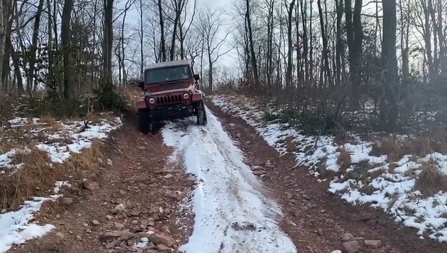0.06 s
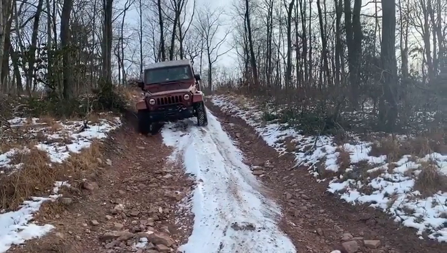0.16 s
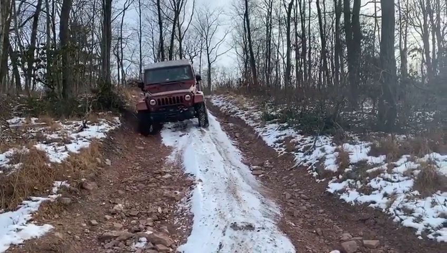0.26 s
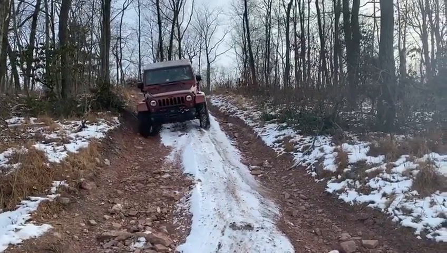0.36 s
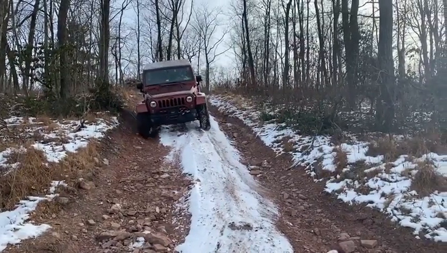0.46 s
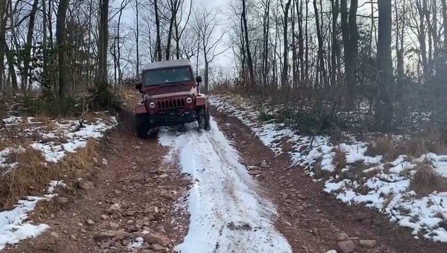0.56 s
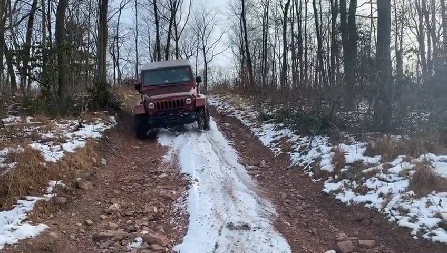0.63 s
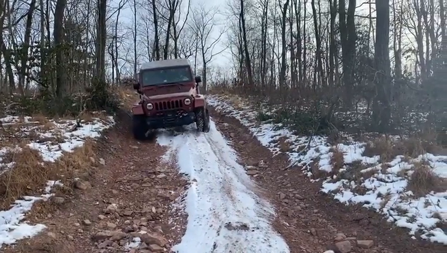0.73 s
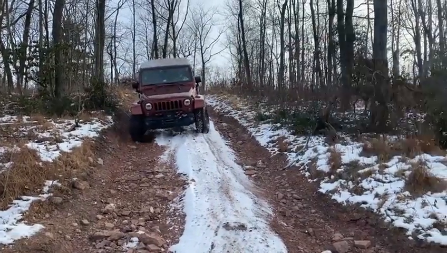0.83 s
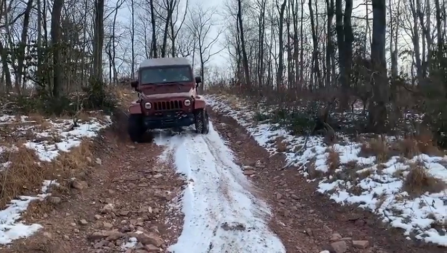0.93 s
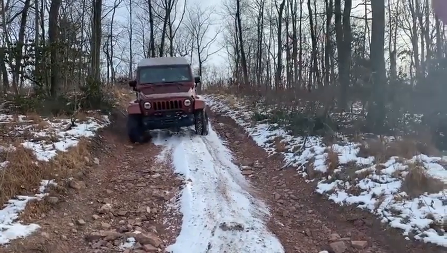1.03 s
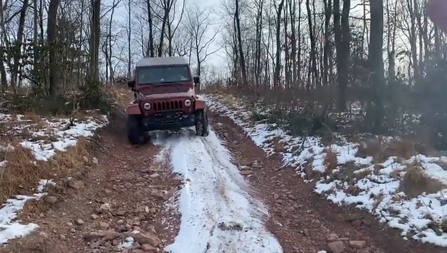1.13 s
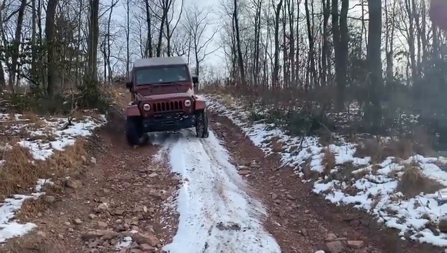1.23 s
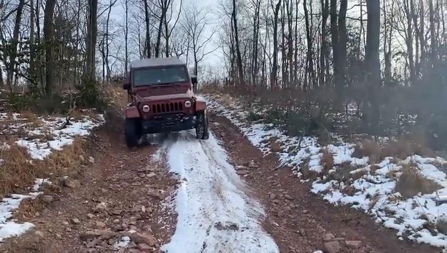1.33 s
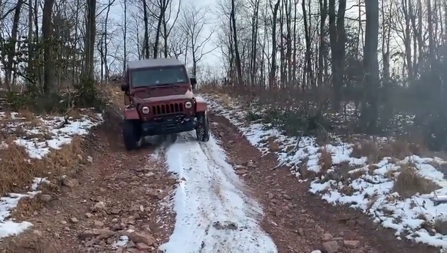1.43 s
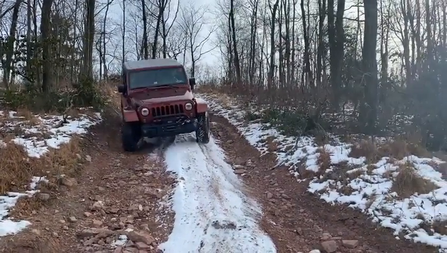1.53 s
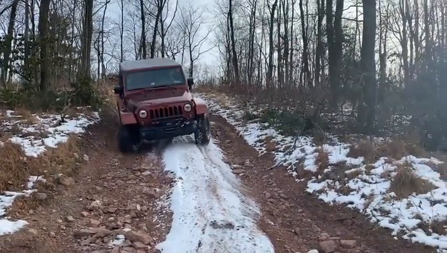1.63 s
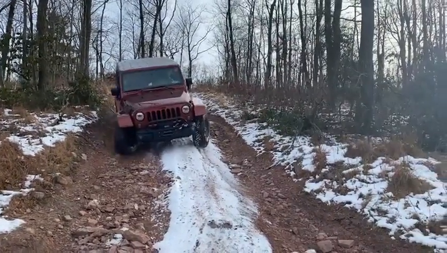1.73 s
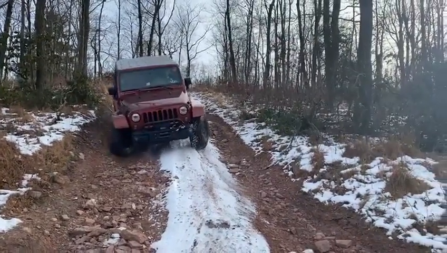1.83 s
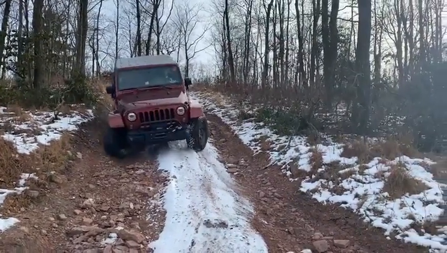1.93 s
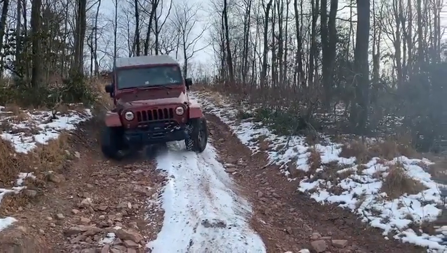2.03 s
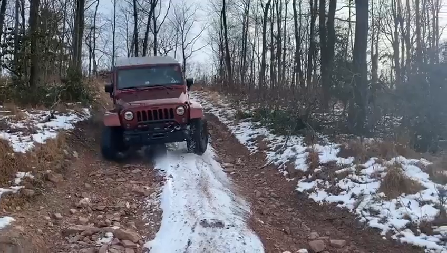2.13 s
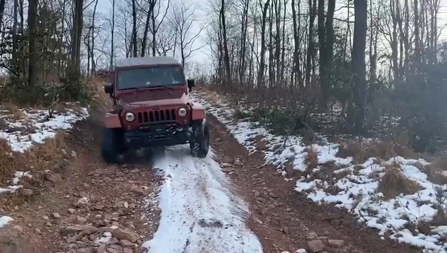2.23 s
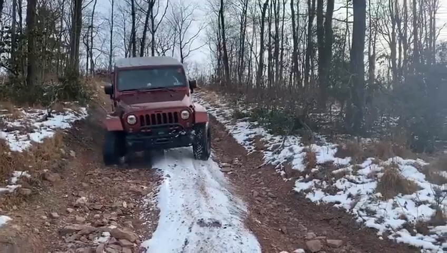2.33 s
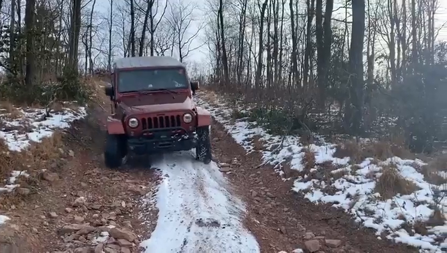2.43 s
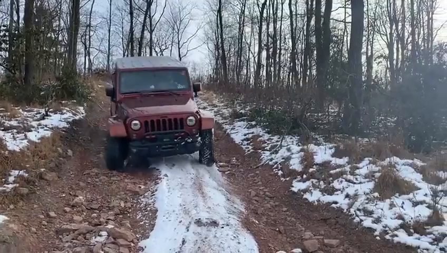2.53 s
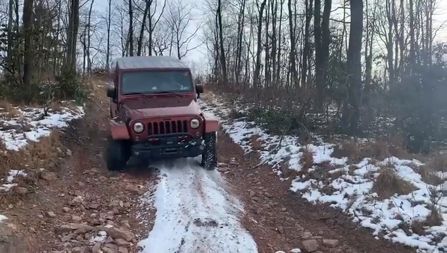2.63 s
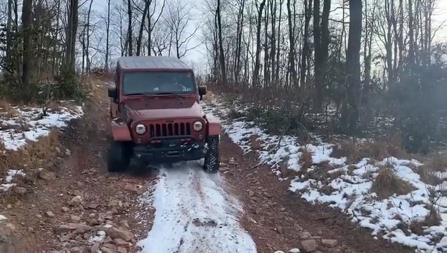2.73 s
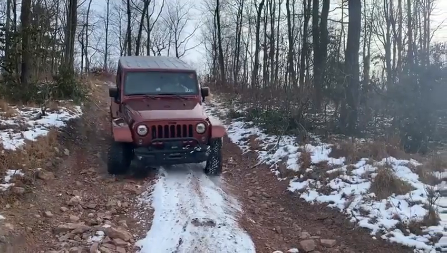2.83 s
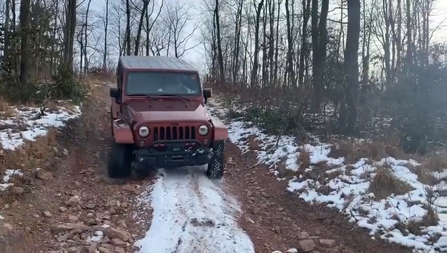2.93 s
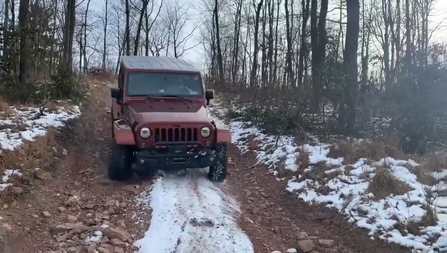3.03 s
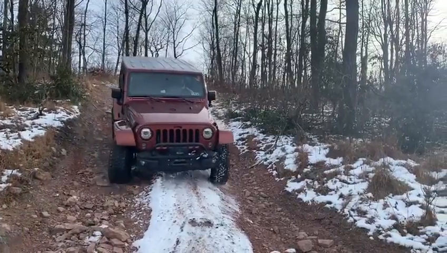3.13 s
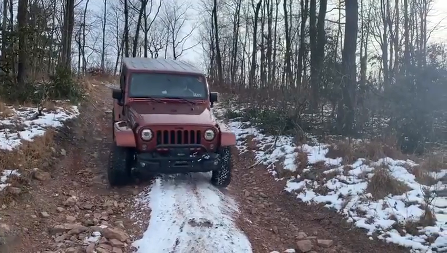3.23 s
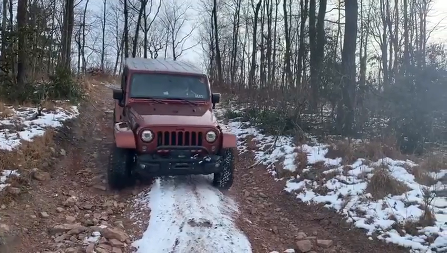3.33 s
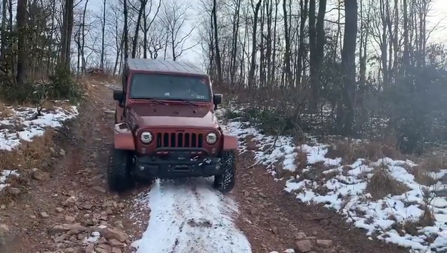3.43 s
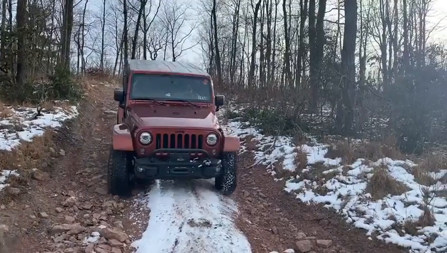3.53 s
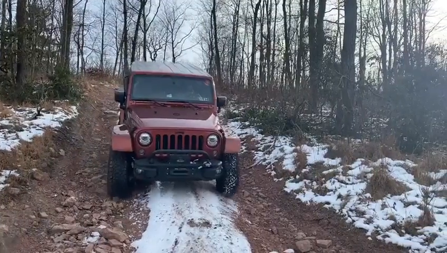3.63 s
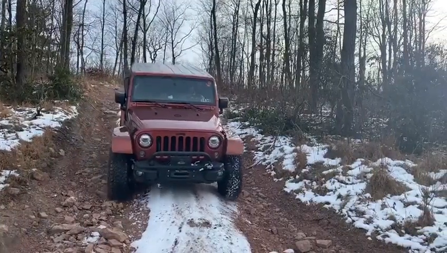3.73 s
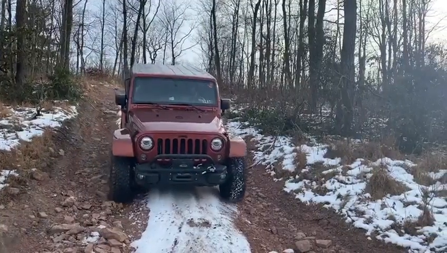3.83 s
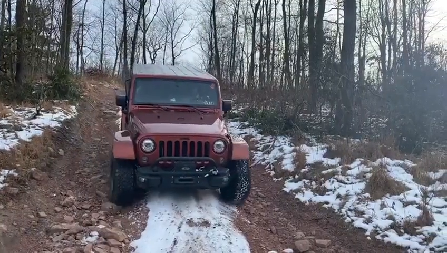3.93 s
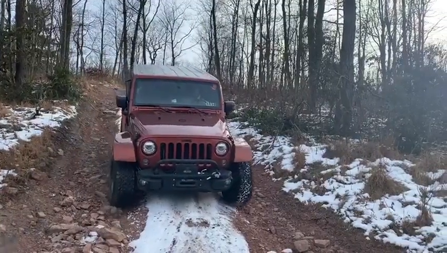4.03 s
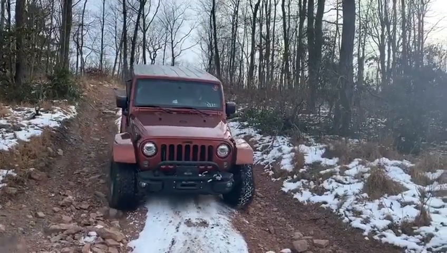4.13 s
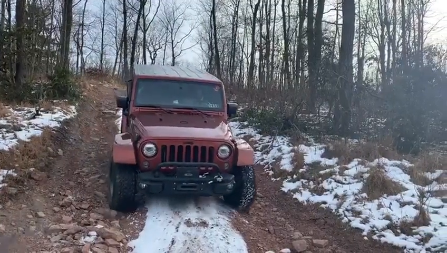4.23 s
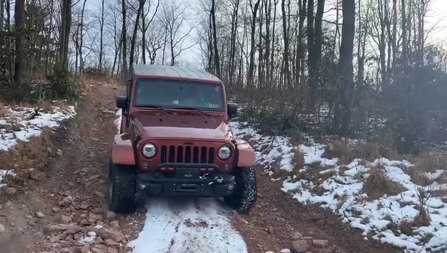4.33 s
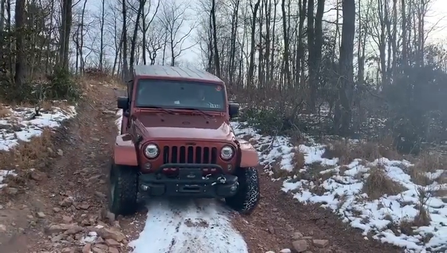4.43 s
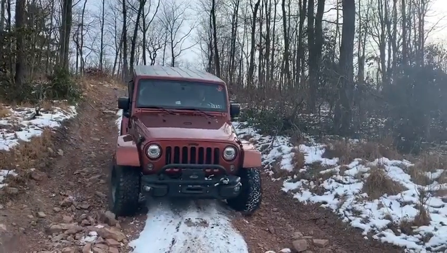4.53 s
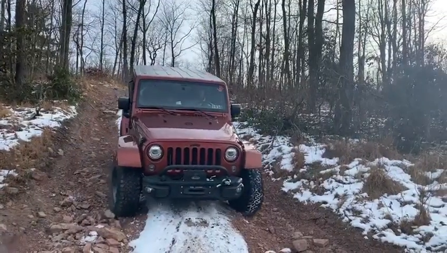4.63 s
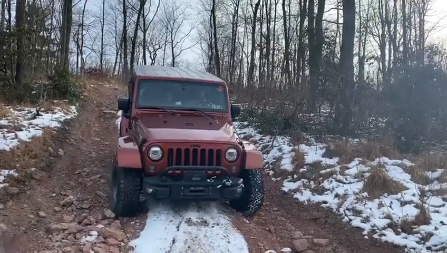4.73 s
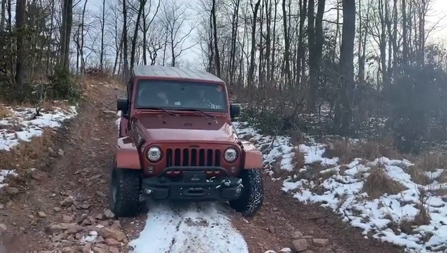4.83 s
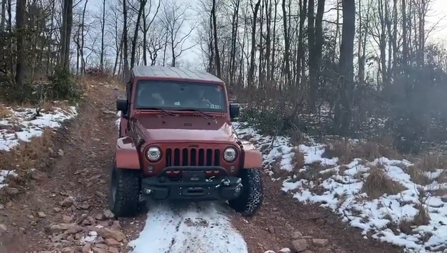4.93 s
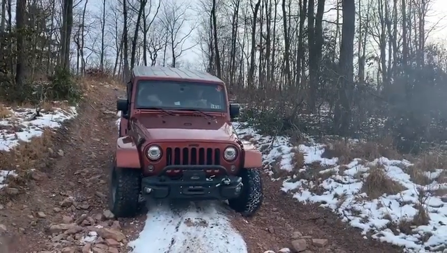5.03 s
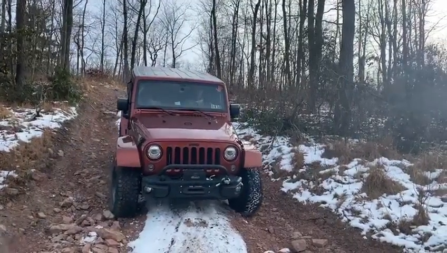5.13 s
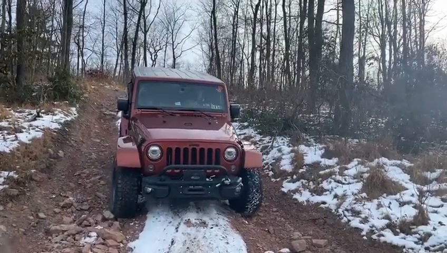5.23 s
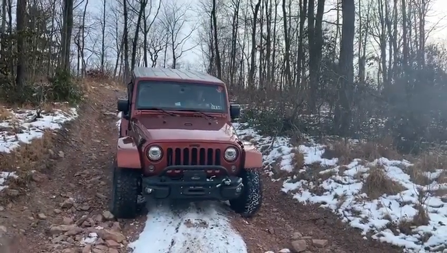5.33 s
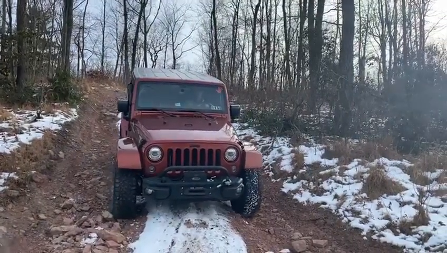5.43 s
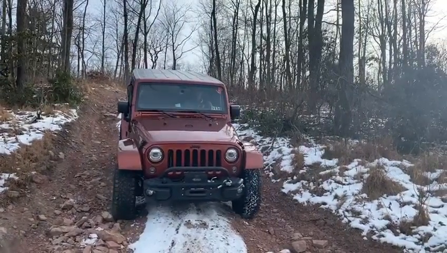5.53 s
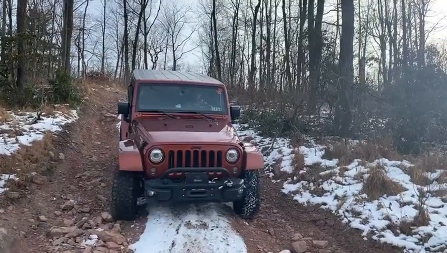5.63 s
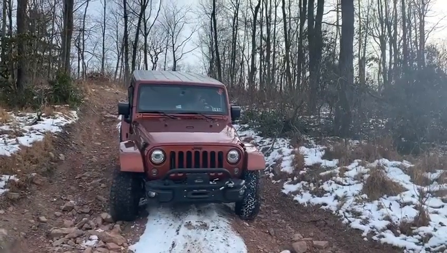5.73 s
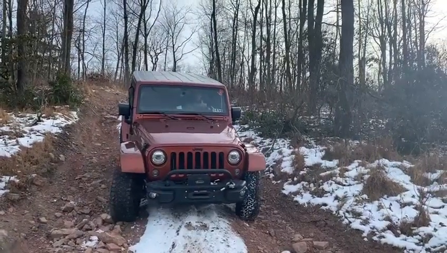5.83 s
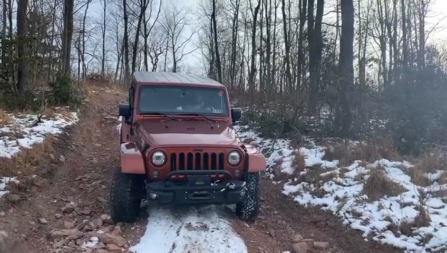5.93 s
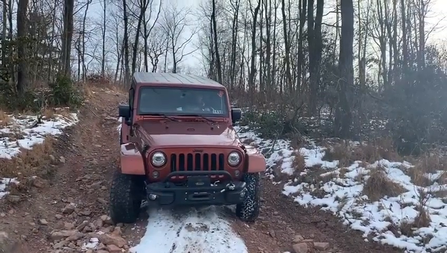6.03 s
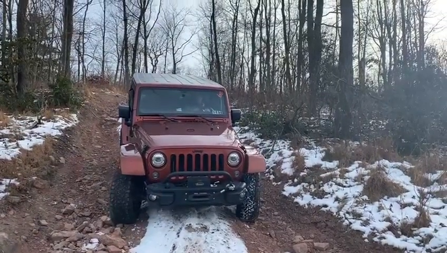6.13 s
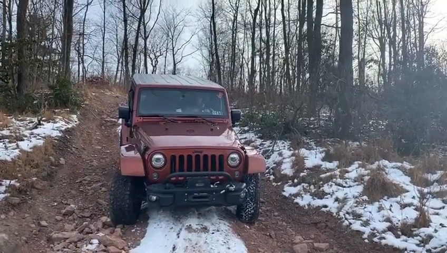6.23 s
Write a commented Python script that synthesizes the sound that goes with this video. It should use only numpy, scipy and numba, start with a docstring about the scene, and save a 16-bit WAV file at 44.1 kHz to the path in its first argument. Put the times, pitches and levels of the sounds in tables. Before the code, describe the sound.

Outdoors on a frozen forest trail, a heavy vehicle creeps closer over loose rock. Stones grind and thud dully, crust crunches, thin ice snaps brightly, and a low engine idles underneath. The tyres judder briefly before the wheels stop near five seconds. Then mostly idle remains, with faint cracks, a short brake groan and a slightly fuller engine. A handheld phone microphone, open air, no echo.

```python
"""Stones grind and knock under tyres, crust crunches and ice splinters over an idling engine; a brake groans once.
A four-wheel-drive creeps down a frozen, stony forest trail towards a phone and brakes almost to a stop.
Debris is heaps of short damped rings; knocks, pebbles and judders are struck modes; cracks and shards add
rushes of coloured noise. The engine is a wavering sine over coloured noise, the brake a tone of two harmonics."""
import sys
import numpy as np
from scipy import signal
from scipy.fft import rfft, irfft, next_fast_len
from scipy.io import wavfile
from scipy.ndimage import uniform_filter1d
from numba import njit

SR = 44100
rng = np.random.default_rng(int(sys.argv[2]) if len(sys.argv) > 2 else 0)


def unload_wav(signal):
    """Save mono or channel-first audio to the path in sys.argv[1] as 16-bit WAV at rate SR, clipped to [-1, 1]."""
    wavfile.write(
        sys.argv[1],
        SR,
        np.round(np.clip(np.atleast_2d(signal).T, -1, 1) * 32767).astype(np.int16),
    )


N = 276859
T = np.arange(N) / SR

# spectra of crust crumbs, grit and splintering ice: f/Hz, relative level/dB per Hz
CRUNCH_SPECTRUM = [(330, -5), (480, -1.5), (710, -7), (960, -5.5), (1130, -15), (1300, -36)]
GRIT_SPECTRUM = [(1000, -22.5), (1200, -3.5), (1500, 0.5), (1800, -0.5), (2150, -16.5), (2800, -35)]
ICE_SPECTRUM = [(1700, -3.5), (2200, -5.5), (3700, -5.5), (4240, -11.5), (5100, -3), (6700, -6.5),
                (7500, -6.5), (8700, -16), (9400, -57.5)]

USUAL_STONES_DB, USUAL_GRIT_DB = -30, -46  # the load at which the other sizes have their own base level
STOP_S = 4.93  # the wheels stop rolling


def undb(db):
    """Decibels to gain."""
    return 10 ** (np.asarray(db) / 20)


def unit(x):
    """Scale to rms 1."""
    return x / np.sqrt(np.mean(x ** 2))


def ramp(start, length):
    """Straight rise from 0 at start to 1 after length seconds."""
    return np.clip((T - start) / length, 0, 1)


def walk(rate):
    """Random levels held 1 / rate s and slewed twice; spread near 1."""
    hold = int(SR / rate)
    steps = np.repeat(rng.standard_normal(N // hold + 1), hold)
    return 1.35 * uniform_filter1d(uniform_filter1d(steps, hold), hold)[:N]


def follow(table):
    """Columns of a curve table, sample by sample."""
    s, *columns = np.transpose(table)
    return (np.interp(T, s, column) for column in columns)


def colour(x, points):
    """Shape a flat signal to a spectrum that falls steeply outside its points; rms 1."""
    hz, db = np.transpose(points)
    size = next_fast_len(N)
    log_f = np.log(np.arange(size // 2 + 1) * SR / size + 1)
    outside = np.maximum(np.maximum(np.log(hz[0]) - log_f, log_f - np.log(hz[-1])), 0)
    gain = undb(np.interp(log_f, np.log(hz), db) - 60 * outside)
    return unit(irfft(rfft(x, size) * gain, size)[:N])


def noise(points):
    """Steady noise of a given spectrum, rms 1."""
    return colour(rng.standard_normal(N), points)


@njit
def ring(start, hz, t60, size, length):
    """Add one damped sine for each grain, from its start sample until it is 60 dB down."""
    out = np.zeros(length)
    for k in range(len(start)):
        turn = np.exp(2j * np.pi * hz[k] / SR - np.log(1000) / (t60[k] * SR))
        z = size[k] + 0j
        for i in range(start[k], min(length, start[k] + int(t60[k] * SR))):
            out[i] += z.imag
            z *= turn
    return out


def grains(points, count, cycles, spread_db):
    """Scattered rings, each 60 dB down after some cycles; a spread makes many small and a few large."""
    when, pitch, luck, side = rng.random((count, 4)).T
    lowest, highest = points[0][0], points[-1][0]
    hz = lowest * (highest / lowest) ** pitch
    # higher grains are shorter and sparser per Hz, so they are made larger to keep the heap flat
    size = hz * undb(-spread_db * np.log(1.004 - luck)) * np.sign(side - .5)
    heap = ring((when * N).astype(np.int64), hz, cycles / hz, size, N)
    return colour(heap, points)


def bursts(s, db, t60, rise):
    """Envelope of short rushes: quick rise, exponential fall."""
    out = np.zeros(N)
    for t0, gain, fall in zip(s, undb(db), t60):
        fall = max(fall, .005)
        i = int(t0 * SR)
        t = T[:min(N - i, int(fall * SR))]
        out[i:i + len(t)] += gain * (1 - np.exp(-t / rise)) * np.exp(-np.log(1000) * t / fall)
    return out


def struck(s, db, hz, t60, ratios, soft):
    """Each blow rings a small cluster of modes (ratio, dB); taking away a faster ring softens the contact."""
    start = (s * SR).astype(np.int64)
    out = 0
    for k, (ratio, mode_db) in enumerate(ratios):
        f = np.minimum(hz * ratio, .45 * SR)
        fall = np.maximum(t60 / ratio, .003)
        size = (-1) ** k * undb(db + mode_db)  # neighbouring modes start in opposite directions
        out = out + ring(start, f, fall, size, N) - ring(start, f, soft * fall, size, N)
    return out


def crunch_level(stones_db, grit_db):
    """Level of the middle size in dB, which follows both the stones and the grit."""
    stones_gain = 0.38 * (stones_db - USUAL_STONES_DB)
    grit_gain = 0.36 * (grit_db - USUAL_GRIT_DB)
    return -39.5 + stones_gain + grit_gain


def clumps(count):
    """Gain of the finer debris: it gives way in sudden lumps, most of similar size, a few much smaller."""
    when, luck = rng.random((count, 2)).T
    db = -15.5 + 1.9 * np.log(1.01 - luck)
    return 0.5 + bursts(when * STOP_S, db, np.full(count, 0.082), rise=0.0064)


def slips():
    """Gains of stones, crunch, grit and ice while the tyre slips and scrapes: brief, with soft edges."""
    # scrapes: t/s, length/s, stones level/dB, grit level/dB, ice level/dB
    scrapes = [(0.788, 0.058, -25.5, -44.5, -71), (1.745, 0.031, -22, -38, -50),
               (1.885, 0.04, -31, -32, -35), (1.993, 0.022, -37, -34.5, -46.5),
               (2.108, 0.047, -20.5, -41, -51), (2.164, 0.08, -24.5, -36.5, -48.5),
               (2.266, 0.024, -22, -42, -45), (2.306, 0.07, -23, -39.5, -50),
               (3.021, 0.026, -25, -45, -47.5), (3.271, 0.041, -53, -38, -43.5),
               (3.721, 0.049, -31, -38.5, -48), (3.788, 0.033, -28, -40, -43),
               (2.657, .15, -28.5, -69, -55)]
    out = np.zeros((4, N))
    for s, length, stones_db, grit_db, ice_db in scrapes:
        db = [stones_db, crunch_level(stones_db, grit_db), grit_db, ice_db]
        out[:, int(s * SR):int((s + length) * SR)] = undb(db)[:, None]
    return uniform_filter1d(out, int(0.015 * SR), axis=1)


def tyres():
    """Debris gives way under the tread as heaps of rings; all but the boom share their patches."""
    # what the tread grinds, before its unevenness: t/s, stones level/dB, grit level/dB
    load = [(0.0, -33, -59.5), (0.5, -33, -56.5), (0.59, -30.5, -46), (0.78, -29, -49), (0.98, -31, -51.5),
            (1.1, -38.5, -50.5), (1.17, -29, -48), (1.49, -24.5, -43), (1.83, -28, -39.5),
            (2.24, -28.5, -45), (2.35, -33, -39), (2.51, -29.5, -44), (2.73, -32.5, -46), (3.18, -28, -42),
            (3.4, -29, -43.5), (3.42, -32.5, -45.5), (3.68, -29, -44), (3.92, -34.5, -46.5),
            (4.3, -30.5, -45), (4.6, -36, -52), (4.82, -42, -56), (4.9, -59, -53)]
    # spectra of tyre and body cavities, stones and frost: f/Hz, relative level/dB per Hz
    boom_spectrum = [(25, -28.5), (50, -3.5), (70, -1), (110, -1.5), (160, -22.5)]
    stones_spectrum = [(80, -32), (130, -1), (290, -4.5), (350, -4), (460, -14.5), (750, -26.5)]
    frost_spectrum = [(6800, -17.5), (7300, -0.5), (8200, -1.5), (8800, -9)]
    stones_db, grit_db = follow(load)
    boom_db = -31 + 0.5 * (stones_db - USUAL_STONES_DB)
    ice_db = -51.5 + 0.86 * (grit_db - USUAL_GRIT_DB)
    frost_db = -6 - 5.5 * T  # against the ice; it thins out as the vehicle nears

    boom = grains(boom_spectrum, count=1500, cycles=8.2, spread_db=1.0) * undb(boom_db)
    stones = grains(stones_spectrum, count=3000, cycles=5.85, spread_db=2.0)
    crunch = grains(CRUNCH_SPECTRUM, count=7000, cycles=16.0, spread_db=2.0)
    grit = grains(GRIT_SPECTRUM, count=7000, cycles=22.6, spread_db=2.0)
    ice = grains(ICE_SPECTRUM, count=30000, cycles=44.0, spread_db=0.5)
    ice = ice + grains(frost_spectrum, count=4000, cycles=77.0, spread_db=0.0) * undb(frost_db)
    debris = np.array([stones, crunch, grit, ice])

    stop_fade_s, fine_fade_s = 0.045, 0.22  # the finer debris dies away sooner
    rolling = 1 - ramp(STOP_S - stop_fade_s, stop_fade_s)
    fine_rolling = 1 - ramp(STOP_S - fine_fade_s, fine_fade_s)
    patch, tread = walk(8.8), walk(40)
    levels_db = np.array([stones_db, crunch_level(stones_db, grit_db), grit_db, ice_db])
    tread_db = np.array([[.3], [1.5], [1.5], [1.5]]) * tread
    steady = rolling * undb(levels_db + 0.66 * patch + tread_db)
    # crunch, grit and ice follow the lumps to different degrees
    steady[1:] *= unit(clumps(count=200)) ** np.array([[.7], [1.1], [.6]]) * fine_rolling
    ground = np.sum(np.hypot(steady, slips()) * debris, axis=0)

    creep = ramp(5.4, 0.11) * undb(-47.5 + 1.7 * walk(7.2))  # the stones move again, faintly
    return rolling * boom + creep * stones + ground


def engine():
    """The exhaust hums at an unsteady firing rate over the engine bay's rumble and hiss, which swell late on."""
    # spectrum of fan and engine bay: f/Hz, relative level/dB per Hz
    bay_spectrum = [(25, -20.5), (55, -1.5), (75, -1), (135, -12), (450, -21), (960, -22), (1110, -31.5),
                    (1450, -22.5), (2300, -30), (3500, -39), (7450, -42), (9800, -69)]
    firing_hz = 64.3 * (1 + 0.039 * walk(12))
    phase = 2 * np.pi * np.cumsum(firing_hz) / SR
    hum = np.sqrt(2) * np.sin(phase) * undb(-42.5 + 2.1 * walk(24))
    swell_db = 3.5 * ramp(5.46, 0.26)
    bay = noise(bay_spectrum) * undb(-44.5 + swell_db + .7 * walk(9))
    return hum + bay


def cracks():
    """A slab of crust breaks: a snap, a short ring, a rush of crumbs, grit and splinters."""
    # breaks: t/s, level/dB, f/Hz, brightness (splinters against that level)/dB
    breaks = [(0.119, -39.5, 1560, -9.5), (0.461, -31.5, 544, -24), (0.754, -27, 920, -29),
              (0.943, -28, 1620, -22.5), (1.681, -20, 768, -24), (1.821, -21.5, 907, -28),
              (2.09, -24, 917, -23.5), (2.456, -25.5, 1784, -12), (2.513, -26, 1775, -15.5),
              (3.073, -21, 1645, -21), (3.376, -18, 812, -25.5), (3.449, -23, 843, -15),
              (3.509, -26, 690, -21.5), (3.657, -23, 690, -20), (3.724, -24.5, 1550, -21),
              (3.921, -33, 610, -34), (4.157, -23, 600, -25), (4.247, -18.5, 556, -30.5),
              (4.288, -33, 1990, -14), (4.409, -33, 670, -26), (4.426, -23.5, 1000, -21.5),
              (4.576, -25, 955, -12.5), (4.669, -28, 1704, -20), (4.697, -33, 990, -23),
              (5.247, -31.5, 1013, -17.5), (5.297, -29, 970, -14), (5.691, -30.5, 990, -21),
              (6.142, -32, 1010, -19.5), (6.188, -34.5, 730, -23)]
    # spectrum of the snap: f/Hz, relative level/dB per Hz
    snap_spectrum = [(1700, -8), (2100, -3.5), (3400, -4), (4600, -12.5)]
    s, db, hz, bright_db = np.transpose(breaks)
    fall = np.full(len(s), 0.096)  # T60 in s
    grit_db = db + 2 + 0.87 * bright_db  # brighter breaks throw more grit
    snap = noise(snap_spectrum) * bursts(s, grit_db - 3, fall, rise=0.0005)
    crumbs = noise(CRUNCH_SPECTRUM) * bursts(s, db - 10, fall, rise=0.0012)
    grit = noise(GRIT_SPECTRUM) * bursts(s, grit_db, fall, rise=0.0012)
    splinters = noise(ICE_SPECTRUM) * bursts(s, db + bright_db, fall, rise=0.0012)
    slab = struck(s, db, hz, 0.49 * fall, [(.68, -10.5), (1, -1.5), (1.25, -10)], soft=0.12)
    return snap + crumbs + grit + splinters + slab


def knocks():
    """Loose stones tip over with a dull thud; deeper ones ring longer."""
    # thuds: t/s, level/dB, f/Hz
    thuds = [(0.121, -8.5, 288), (0.46, -14.5, 107), (0.732, -16.5, 73), (0.774, -15.5, 178),
             (0.9, -13.5, 231), (1.351, -16.5, 220), (1.553, -14, 148), (1.743, -2.5, 215.6),
             (1.996, -14, 216), (2.113, -12.5, 132), (2.136, -9, 202), (2.168, -9.5, 175), (2.268, -9, 299),
             (2.317, -14.5, 324), (3.127, -9, 160), (3.335, -13.5, 126), (3.398, -15.5, 169),
             (3.628, -12, 74), (3.661, -16, 110), (4.061, -16.5, 236), (4.134, -15, 156),
             (4.377, -18.5, 195), (4.53, -16.5, 93.5), (4.604, -15, 96.6), (4.625, -13.5, 98.4),
             (4.647, -9.5, 75.6), (4.7, -13.5, 230), (4.729, -13.5, 84.6), (4.849, -25, 71),
             (5.502, -29.5, 310), (5.945, -30.5, 283), (6.158, -29.5, 180), (6.193, -28, 86)]
    s, db, hz = np.transpose(thuds)
    t60 = 0.074 * (hz / 200) ** -0.78
    return struck(s, db, hz, t60, [(.6, -7.5), (1, 0), (1.6, -6)], soft=0.29)


def shards():
    """Thin ice snaps: a bright rush and a tiny ping."""
    # snaps: t/s, ping level/dB, f/Hz, rush against ping/dB
    snaps = [(0.4039, -37, 8040, -0.5), (0.4796, -39.5, 8050, -11), (0.698, -32, 7500, -7),
             (0.7243, -34, 5820, -1.5), (0.959, -39, 7600, -11), (1.5265, -32.5, 5540, -5),
             (2.0637, -34, 5820, -6), (2.139, -43, 3560, 8.5), (2.446, -39, 7100, 3),
             (2.584, -37, 5540, 0.5), (2.907, -30, 5120, -14), (2.943, -29.5, 5860, -12),
             (2.964, -37, 6000, -7), (3.69, -30, 5540, -2.5), (5.195, -52, 5140, -1)]
    s, db, hz, rush_db = np.transpose(snaps)
    fall = np.full(len(s), 0.035)  # T60 in s
    rush = noise(ICE_SPECTRUM) * bursts(s, db + rush_db, fall, rise=0.00094)
    ping = struck(s, db, hz, 0.53 * fall, [(1, 0.0044)], soft=0.17)
    return rush + ping


def pebbles():
    """Small stones click together: three brief modes, damped within a set number of cycles."""
    # clicks: t/s, level/dB, f/Hz
    clicks = [(.574, -28.5, 1910), (1.044, -28.5, 1790), (2.435, -29, 2720), (2.493, -28, 2720),
              (2.6006, -21, 2000), (2.9643, -30, 2000), (3.702, -16.5, 680), (3.8176, -33, 3030),
              (3.9734, -32, 2210), (3.9897, -26, 2350), (4.16, -27, 1970), (5.766, -23.5, 710)]
    s, db, hz = np.transpose(clicks)
    t60 = 21.6 / hz
    return struck(s, db, hz, t60, [(.7, -9.5), (1, -4), (1.4, -10.5)], soft=0.15)


def judders():
    """The locked tyre judders over stone: rubber grips and lets go in uneven jolts whose ring slides in pitch."""
    # runs of jolts: t/s, length/s, mean rate/Hz, level at the end/dB, first f/Hz, last f/Hz
    runs = [(4.283, .066, 125, -11.5, 210, 430), (4.45, .065, 110, -20.5, 540, 570)]
    swell_db = 5  # from the start of a run to its end
    out = 0
    for s, length, rate, end_db, first_hz, last_hz in runs:
        timing, strength_db = rng.standard_normal((40, 2)).T
        gaps = (1 + 0.124 * np.clip(timing, -2, 2)) / rate
        t = np.cumsum(gaps) - 1 / rate
        keep = t < length
        t = t[keep]
        progress = t / length
        hz = first_hz + (last_hz - first_hz) * progress
        db = end_db + swell_db * (progress - 1) + strength_db[keep]
        t60 = np.full(len(t), .028)
        out = out + struck(s + t, db, hz, t60, [(.55, -6.5), (1, -1.5), (1.4, -5.5)], soft=0.18)
    return out


def brake():
    """The pads stick and slip as the wheels creep: a low, slightly rough tone of two harmonics."""
    start_s, rise_s, hold_s, fall_s = 5.8, 0.0099, 0.12, 0.061
    groan_hz = 225 * (1 + 0.002 * walk(20))
    phase = 2 * np.pi * np.cumsum(groan_hz) / SR
    gate = ramp(start_s, rise_s) * (1 - ramp(start_s + rise_s + hold_s, fall_s))
    tone = np.sin(phase) + undb(-5) * np.sin(2 * phase)
    return np.sqrt(2) * gate * tone * undb(-40.5 + 1.2 * walk(35))


def scene():
    """Everything in the open air, one channel."""
    ground = tyres() + cracks() + knocks() + shards() + pebbles() + judders()
    return (ground + engine() + brake())[None]


def record(dry):
    """The phone drops the deepest bass and cuts the top."""
    bass_cut = signal.butter(2, 36., "high", fs=SR, output="sos")
    top_cut = signal.ellip(8, .2, 70, 9700, fs=SR, output="sos")
    return signal.sosfilt(top_cut, signal.sosfilt(bass_cut, dry))


dry = scene()
out = record(dry)
unload_wav(out)
```